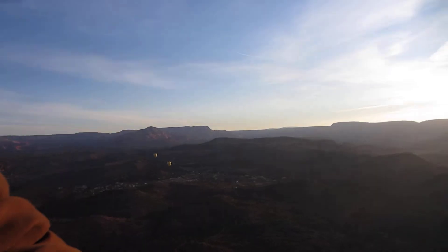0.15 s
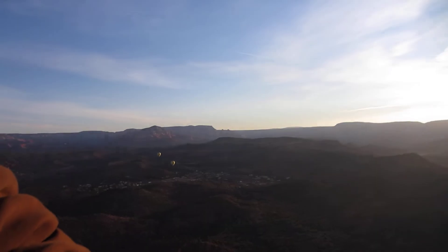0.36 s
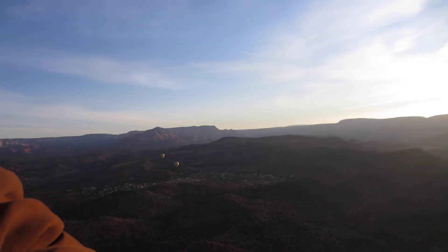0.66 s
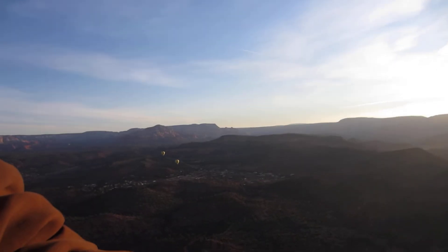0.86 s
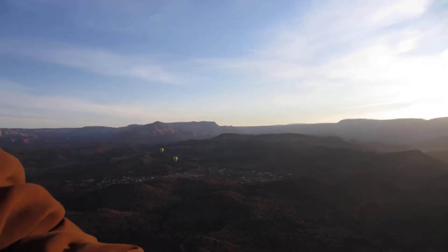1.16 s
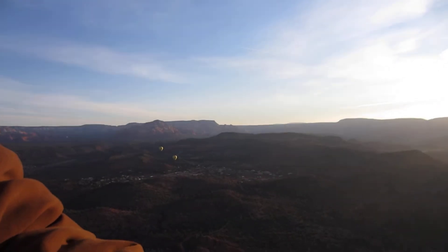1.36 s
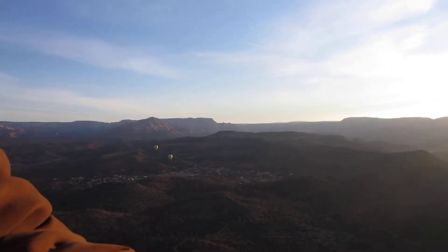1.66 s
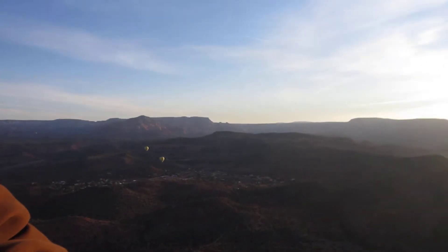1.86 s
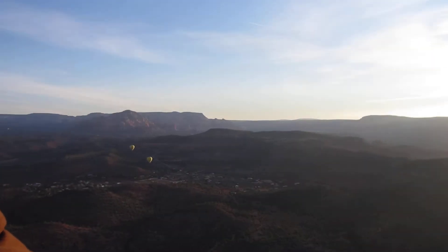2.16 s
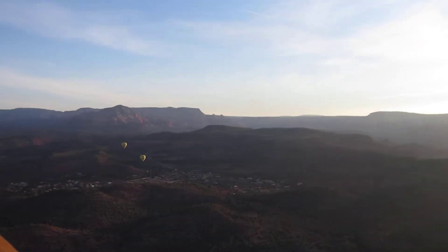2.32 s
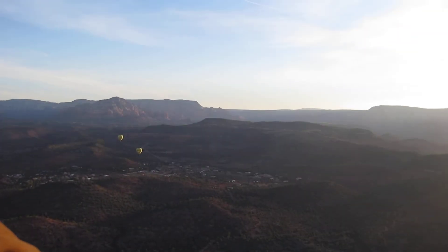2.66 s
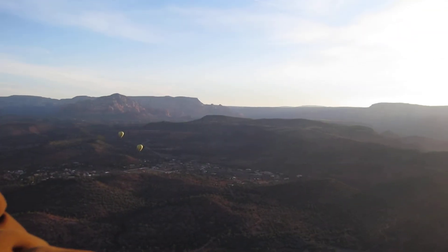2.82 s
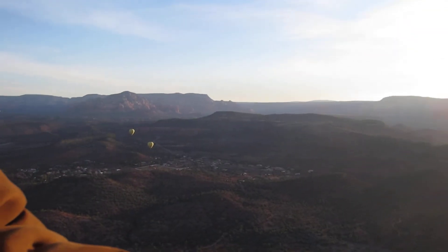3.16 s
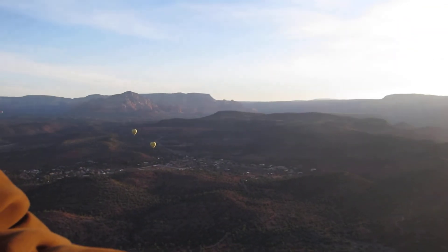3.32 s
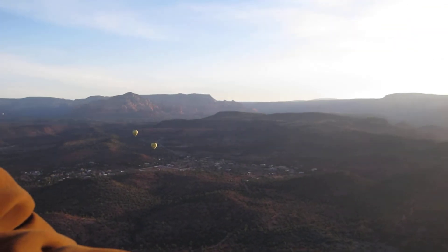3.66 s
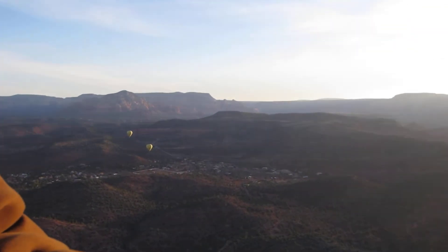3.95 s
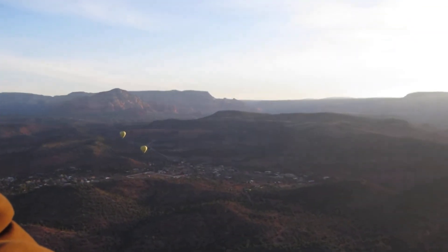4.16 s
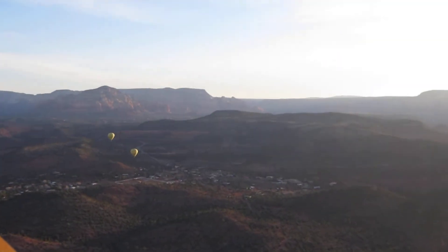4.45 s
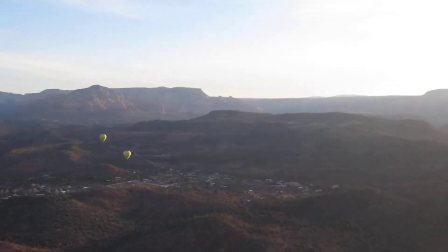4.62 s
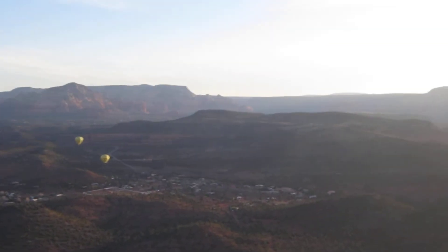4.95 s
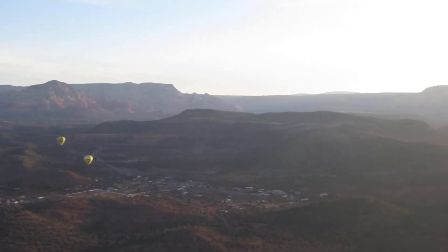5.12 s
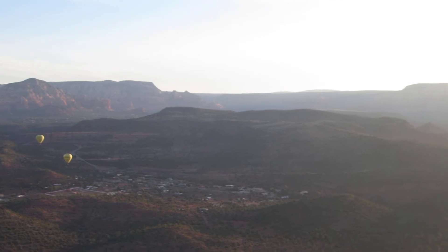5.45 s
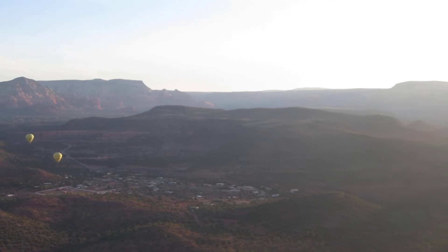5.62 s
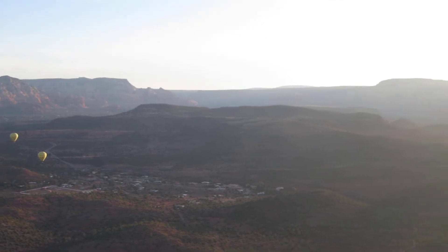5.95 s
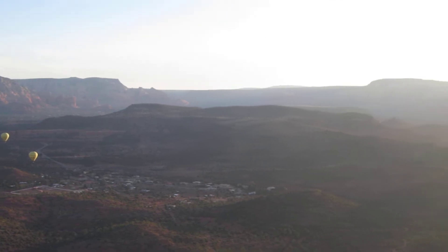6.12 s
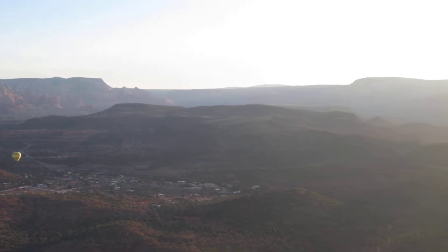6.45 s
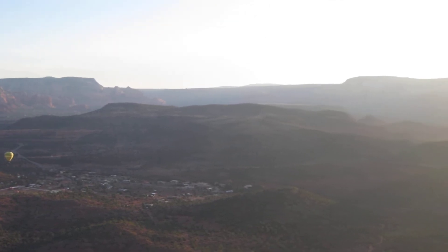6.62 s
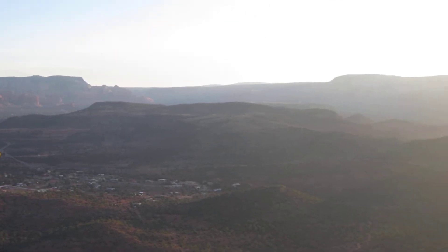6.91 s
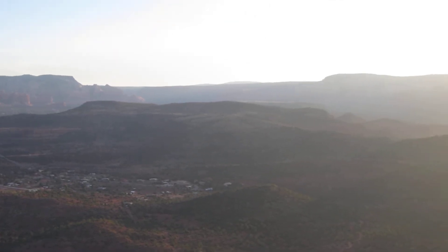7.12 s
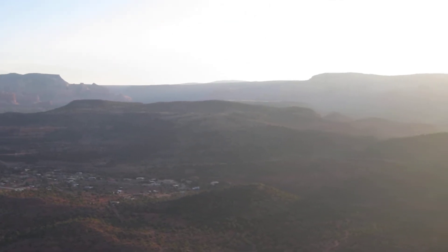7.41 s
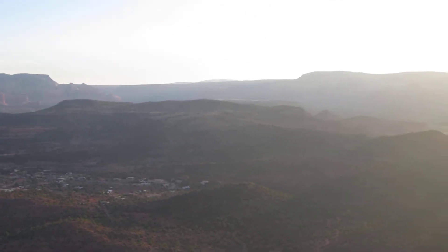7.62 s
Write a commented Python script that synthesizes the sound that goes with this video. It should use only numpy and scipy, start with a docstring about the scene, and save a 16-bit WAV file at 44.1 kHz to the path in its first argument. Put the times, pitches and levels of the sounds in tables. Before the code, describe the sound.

The sound opens quietly in the open basket of a hot air balloon, with the soft, slightly hollow hiss of a pilot flame that grows a little over the first second. A light breeze bumps the microphone in short, low gusts until about 2.2 seconds, and cloth rustles faintly around half a second in. At about 2.5 seconds the valve spits and the gas catches with a sudden deep thump. The burner immediately swells into a loud, close, fluttering roar, with rushing gas, a bright hiss and a faint hollow ring above it. The roar eases slightly after ignition, then holds steady until the end, near 8 seconds. The hiss turns a little duller from about 3.8 to 5.3 seconds. Three tiny dry ticks fall at roughly 2.5, 3.8 and 5.1 seconds. Everything is near the microphone, in open air without echo.

```python
"""The propane burner of a hot air balloon roars, heard from the basket in open air.
Its valve spits, the gathered gas catches with a thump, and turbulent combustion roars on over the
rush and hiss of the jets. From the start a pilot flame excites the resonances of its burner tube,
a breeze buffets the microphone and cloth rustles softly. While its lens zooms, the camera dulls
the sound around 4 kHz; three tiny ticks are heard."""
import sys
import numpy as np
from scipy import signal
from scipy.fft import rfft, irfft
from scipy.io import wavfile
from scipy.ndimage import uniform_filter1d

SR = 44100
rng = np.random.default_rng(int(sys.argv[2]) if len(sys.argv) > 2 else 0)


def transcribe(u):
    """Save the signal u as a 16-bit wav file named by the first command-line argument.

    u: samples, shape (n,) or (channels, n), limited to [-1, 1]; the rate is SR.
    q: integer samples, one column per channel.
    """
    v = np.clip(np.atleast_2d(u).T, -1, 1)
    q = np.round(v * 32767).astype(np.int16)
    wavfile.write(sys.argv[1], SR, q)


N = 343098
TIME = np.arange(N) / SR
FREQS = np.maximum(np.arange(N // 2 + 1) * SR / N, 1)
VALVE_S, IGNITION_S, IGNITION_ATTACK_S = 2.447, 2.462, 0.012

# Spectral densities of the sources: f/Hz, relative level/dB
ROAR_SPECTRUM = [(12, -48), (25, -31), (50, -16.5), (100, -9.5), (145, -4), (280, -2.5), (400, -6),
                 (520, -10.5), (700, -17.5), (1000, -22.5), (1300, -31.5), (2000, -48)]
RUSH_SPECTRUM = [(700, -9.5), (1100, -5.5), (1500, -4.5), (2000, -5.5), (2600, -4), (3100, -8.5),
                 (3600, -14.5), (5000, -29)]
HISS_SPECTRUM = [(1500, -25), (3000, -0.5), (3550, -5), (3900, 2), (4900, -1.5), (5600, 0.5), (6300, -1.5),
                 (7700, 0.5), (9200, -1.5), (11000, -9), (13000, -9), (16000, -9.5)]
IGNITION_SPECTRUM = [(20, -12), (50, -7), (80, -8), (130, 8), (220, -10.5), (380, -2.5), (600, -17),
                     (1200, -36.5), (4000, -57)]
PILOT_SPECTRUM = [(60, -23), (140, -6), (190, -8.5), (270, -3.5), (400, -7.5), (620, -17), (1100, -18.5),
                  (2800, -32), (4500, -35), (8000, -39.5), (10500, -55.5), (15500, -56.5)]
BREEZE_SPECTRUM = [(20, -12), (55, -2.5), (100, -1), (160, -5), (260, -18), (600, -36), (2000, -63)]
RUSTLE_SPECTRUM = [(200, -10), (700, 5), (1100, 4), (2000, 0), (4000, -13), (6200, -7), (8000, -15),
                   (15000, -35)]
# Resonances of the flame can with its heating coil, and of the burner tube: f/Hz, width/Hz, gain/dB
CAN_RESONANCES = [(159.4, 53, 3.5), (204, 28, -3), (265.5, 46, 3.5), (374.6, 43, 4), (674, 45, -3),
                  (835, 226, 5.5), (2660, 230, 3)]
TUBE_RESONANCES = [(307, 110, 0.5), (814, 124, 7.5), (1250, 520, -8.5), (1598, 77, 8.5), (1763, 200, 8.5),
                   (2360, 140, 5), (2663, 200, 12), (3700, 83, -5), (4250, 100, 4), (4750, 300, -5.5),
                   (5080, 110, 9.5), (5480, 110, 6.5), (6080, 260, 3.5), (6630, 150, -6), (6880, 140, 2),
                   (7590, 220, 10), (9200, 250, 8)]
# Stereo spread of the main and pilot flames: f/Hz, side level re mid/dB
BURNER_SPREAD = [(80, -15.5), (420, -22), (600, -35), (780, -20), (1150, -11), (1500, -15), (1950, -58),
                 (2450, -15), (3400, -8.5), (4000, -30), (4700, -9), (6200, -5), (11000, -9.5), (15500, -1)]
PILOT_SPREAD = [(200, -16.5), (400, -13.5), (850, -12), (1270, -1), (1700, -15), (3000, -7.5), (4100, -9),
                (6200, -6), (7600, -9), (15000, -4)]
# Course of the gas flow and of the jets' hiss: t/s, relative level/dB
GAS_FLOW = [(2.65, -29), (2.75, -31), (2.78, -32.5), (3.35, -30), (3.58, -31.5), (5.15, -35), (5.35, -33.5),
            (6.95, -33), (7.78, -31.5)]
HISS_ENVELOPE = [(2.65, -37.5), (3.29, -35.5), (4.39, -41.5), (4.82, -38.5), (5.21, -41), (5.42, -36),
                 (5.94, -38), (7.75, -38.5), (7.78, -36)]
# Gusts on the microphone and rustles of cloth: t/s, peak level/dB
GUST_PEAKS = [(0.14, -32), (0.24, -34), (0.41, -38), (0.83, -36), (1.39, -41), (1.67, -34), (1.79, -40),
              (1.88, -41), (2.18, -46)]
RUSTLE_PEAKS = [(0.39, -53), (0.585, -53), (0.67, -48.5)]
# Runs of the lens motor: start t/s, end t/s
ZOOM_SPANS = [(0.742, 2.545), (3.787, 5.272)]
# Sharp ticks: t/s, peak level/dB
TICK_PEAKS = [(2.5455, -24), (3.7815, -15), (5.0865, -12)]


def burner(surge_db=2.5, settle_s=0.95, part_open_db=-6, flutter_hz=18.0):
    """Turbulent flow noise: burning eddies roar, gas rushes from the coil and hisses in the jets."""
    flow_db = envelope(GAS_FLOW)
    flow_db -= flow_db[TIME > VALVE_S].mean()
    fresh_flame_db = surge_db * np.exp(-since(IGNITION_S) / settle_s)
    turbulence = drift(flutter_hz)   # modulates all three sounds together
    can = resonance_gain(CAN_RESONANCES)
    roar = radiate(eddies(12000, spread_db=1.5), gain_curve(ROAR_SPECTRUM) * can, BURNER_SPREAD, 0.51)
    rush = radiate(eddies(20000, spread_db=0.5), gain_curve(RUSH_SPECTRUM) * can, BURNER_SPREAD, 0.67)
    hiss = radiate(rng.standard_normal(N), gain_curve(HISS_SPECTRUM), BURNER_SPREAD, lean=0.21)
    rush += from_db(-3) * hollow_ring()
    roar *= from_db(-16 + 0.37 * flow_db + fresh_flame_db + 0.55 * turbulence)
    rush *= from_db(-34 + 0.94 * flow_db + 0.67 * turbulence)
    hiss *= from_db(5 + envelope(HISS_ENVELOPE) + 0.62 * turbulence)
    # The jets sound as soon as the valve opens; the flame follows once the gas has caught.
    gas = 0.64 * ramp(VALVE_S, 0.002) + 0.36 * ramp(VALVE_S, 0.013)
    flame = ramp(IGNITION_S, IGNITION_ATTACK_S)
    # The valve passes part of the gas at first, then opens fully.
    throttle_db = part_open_db * (1 - ramp(VALVE_S + 0.078, 0.088))
    return ((hiss + rush) * gas + roar * flame) * from_db(throttle_db)


def hollow_ring(start_hz=1866, rise_hz_per_s=13.0, width_hz=215.0):
    """Noise-driven resonance: a hollow ring near 1.9 kHz slowly rises in pitch during the blast."""
    phase = 2 * np.pi * np.cumsum(start_hz + rise_hz_per_s * since(VALVE_S)) / SR
    return drift(width_hz) * np.cos(phase) + drift(width_hz) * np.sin(phase)


def ignition(level_db=-5.5, hold_s=0.014, release_s=0.0032):
    """Sudden thermal expansion: the gathered gas burns all at once with a deep thump."""
    spent_s = IGNITION_S + IGNITION_ATTACK_S + hold_s
    swell = ramp(IGNITION_S, IGNITION_ATTACK_S) * np.exp(-since(spent_s) / release_s)
    flash = radiate(rng.standard_normal(N), gain_curve(IGNITION_SPECTRUM), BURNER_SPREAD, lean=0.3)
    return from_db(level_db) * burst(flash, swell)


def valve(level_db=-26.0, decay_s=0.0017):
    """Pressure release: the blast valve lets go with a short, dull spit."""
    band = signal.butter(2, [170, 600], "band", fs=SR, output="sos")
    gas = signal.sosfilt(band, rng.standard_normal(N))
    age = since(VALVE_S) / decay_s
    return from_db(level_db) * burst(gas, age * np.exp(1 - age))


def pilot(start_db=-40.5, growth_db_per_s=2.53, steady_s=1.34, flutter_db=0.87):
    """Air-column resonance: the small flame's noise rings in the burner tube, grows, then holds."""
    colour = gain_curve(PILOT_SPECTRUM) * resonance_gain(TUBE_RESONANCES)
    flame = radiate(rng.standard_normal(N), colour, PILOT_SPREAD, lean=0.25)
    level_db = start_db + growth_db_per_s * np.minimum(TIME, steady_s)
    return flame * from_db(level_db + flutter_db * drift(rate_hz=12.0))


def breeze(lull_db=-46, gust_width_s=0.031, flutter_db=2.5, opposed_db=6.0):
    """Turbulent pressure: moving air pushes on one microphone port while it pulls on the other."""
    air = radiate(rng.standard_normal(N), gain_curve(BREEZE_SPECTRUM), [(100, opposed_db)])
    # Level the noise, so that the gusts set the strength of each buffet.
    air /= np.sqrt(uniform_filter1d(np.mean(air ** 2, axis=0), size=2200) + 1e-9)
    gusts = sum(from_db(db) * hump(t, gust_width_s, gust_width_s) for t, db in GUST_PEAKS)
    return air * np.hypot(from_db(lull_db), gusts) * from_db(flutter_db * drift(rate_hz=16.0))


def rustle(rise_s=0.025, fall_s=0.079):
    """Stick-slip friction: cloth fibres catch and let go, like a sleeve on the basket rim."""
    fibres = radiate(eddies(4000, spread_db=3.5), gain_curve(RUSTLE_SPECTRUM), [(1000, -11)])
    return fibres * sum(from_db(db) * hump(t, rise_s, fall_s) for t, db in RUSTLE_PEAKS)


def ticks(decay_s=0.00015):
    """Impulses with exponential decay: tiny dry ticks, alike in both channels."""
    impulses = np.zeros(N)
    for t, db in TICK_PEAKS:
        impulses[round(t * SR)] = from_db(db)
    return signal.lfilter([1], [1, -np.exp(-1 / (decay_s * SR))], impulses + 1e-18)


def port_cavity(x, centre_hz=12080.0, width_hz=2700.0, depth=0.92):
    """Antiresonance: the cavity in front of the microphone cancels a band high in the treble."""
    return x - depth * resonant_band(x, centre_hz, width_hz)


def zoom_notch(x, centre_hz=4200.0, width_hz=2780.0, depth=0.71):
    """Band rejection: a broad notch is switched in while the lens motor runs."""
    zooming = sum(ramp(start, 0.004) - ramp(end, 0.0036) for start, end in ZOOM_SPANS)
    return x - depth * zooming * resonant_band(x, centre_hz, width_hz)


def radiate(source, colour, spread, lean=0.0):
    """Scattering in the basket and a lean to the right make the channels differ; coloured, rms 1."""
    direct = rfft(source)
    scattered = rfft(rng.standard_normal(N))
    side = gain_curve(spread) * (np.sqrt(1 - lean ** 2) * scattered - lean * direct)
    return unit_rms(irfft(colour * np.array([direct + side, direct - side]), N))


def eddies(per_s, spread_db):
    """Shot noise: a Poisson stream of pressure pulses of uneven size, rms 1."""
    count = rng.poisson(per_s / SR, N)
    pulses = np.sqrt(count) * rng.standard_normal(N)
    return unit_rms(pulses * from_db(spread_db * np.clip(rng.standard_normal(N), -2, 2)))


def drift(rate_hz):
    """Random fluctuation: low-passed noise of rms 1."""
    return unit_rms(irfft(rfft(rng.standard_normal(N)) / (1 + (FREQS / rate_hz) ** 2), N))


def resonant_band(x, centre_hz, width_hz):
    """Response of a second-order resonator to x."""
    return signal.lfilter(*signal.iirpeak(centre_hz, centre_hz / width_hz, fs=SR), x)


def resonance_gain(resonances):
    """Frequency response of a body: Lorentzian peaks and dips, summed in decibels."""
    return from_db(sum(db / (1 + (2 * (FREQS - hz) / width) ** 2) for hz, width, db in resonances))


def gain_curve(points):
    """Gain from levels interpolated over log frequency."""
    hz, db = np.transpose(points)
    return from_db(np.interp(np.log(FREQS), np.log(hz), db))


def envelope(points):
    """Level in dB, interpolated over time."""
    return np.interp(TIME, *np.transpose(points))


def burst(noise, swell):
    """Amplitude modulation: noise under a swell, scaled to that swell's energy."""
    return unit_rms(noise * swell) * np.sqrt(np.mean(swell ** 2))


def hump(at_s, rise_s, fall_s):
    """Two-sided Gaussian swell of height 1."""
    return np.exp(-((TIME - at_s) / np.where(TIME < at_s, rise_s, fall_s)) ** 2)


def ramp(at_s, rise_s):
    """Linear onset from 0 to 1."""
    return np.clip((TIME - at_s) / rise_s, 0, 1)


def since(at_s):
    """Seconds elapsed since a moment, 0 before it."""
    return np.maximum(TIME - at_s, 0)


def from_db(db):
    """Level to amplitude ratio."""
    return 10 ** (np.asarray(db) / 20)


def unit_rms(x):
    """Normalisation to rms 1."""
    return x / np.sqrt(np.mean(x ** 2) + 1e-20)


def scene():
    """Superposition in a free field: every source is close, and no walls reflect."""
    return pilot() + breeze() + rustle() + valve() + ignition() + burner()


def record(dry, start_s=0.06, cutoff_hz=15750):
    """Filtering and saturation: the camera starts, colours the sound, rounds peaks, cuts the top."""
    x = zoom_notch(port_cavity(dry)) * ramp(start_s, 0.0014) + ticks()
    saturated = x / (1 + x ** 6) ** (1 / 6)
    return signal.sosfilt(signal.ellip(12, 0.1, 90, cutoff_hz, fs=SR, output="sos"), saturated)


dry = scene()
out = record(dry)
transcribe(out)
```